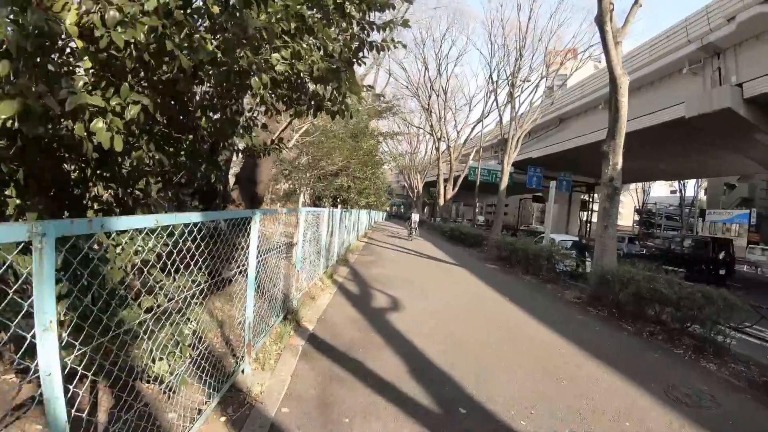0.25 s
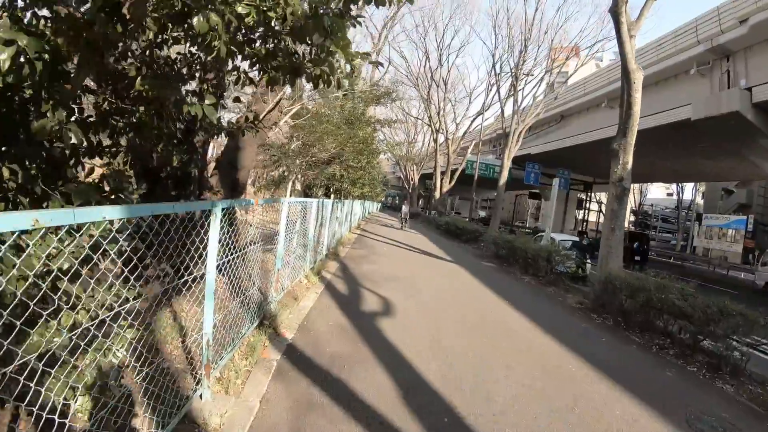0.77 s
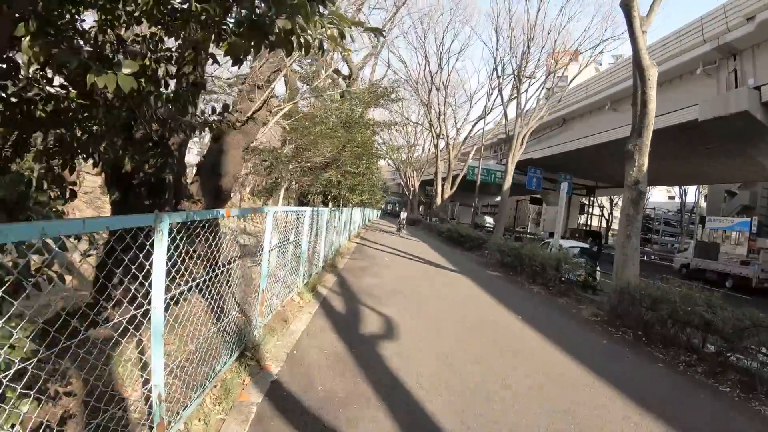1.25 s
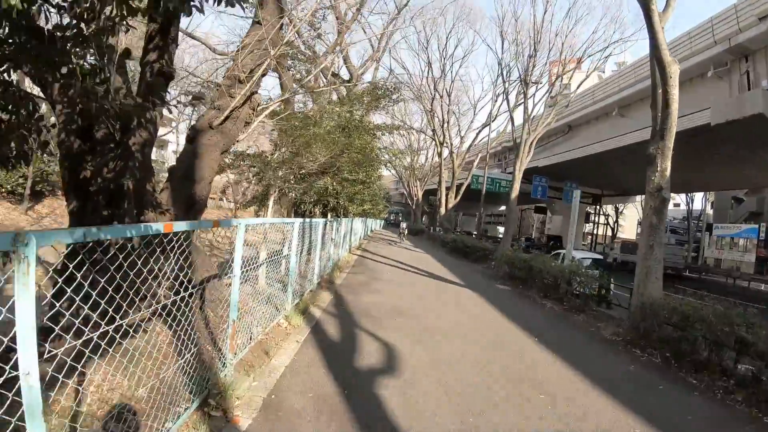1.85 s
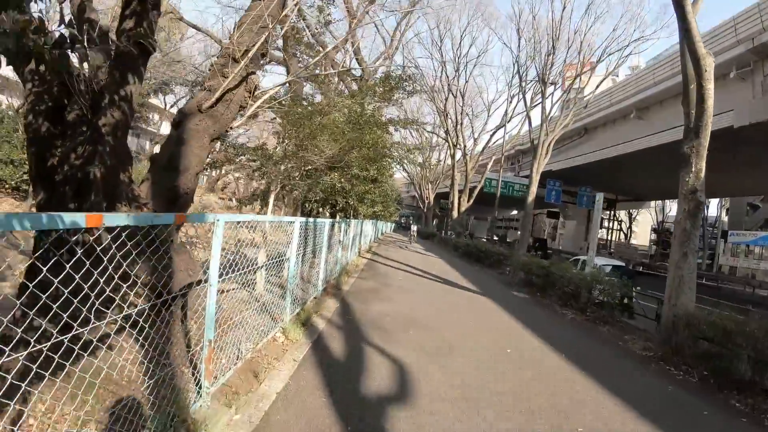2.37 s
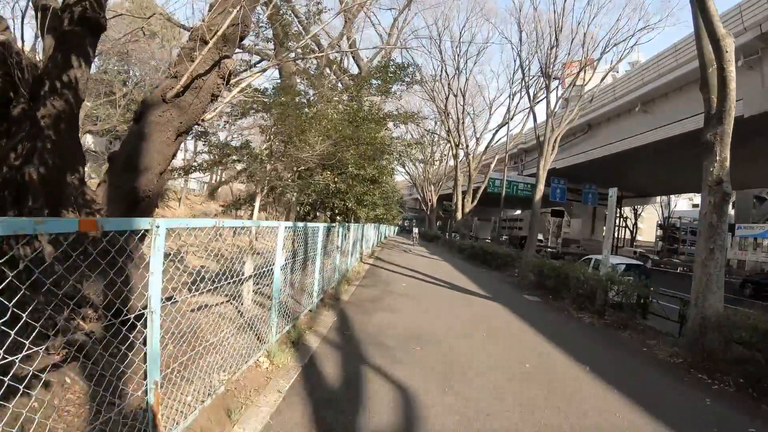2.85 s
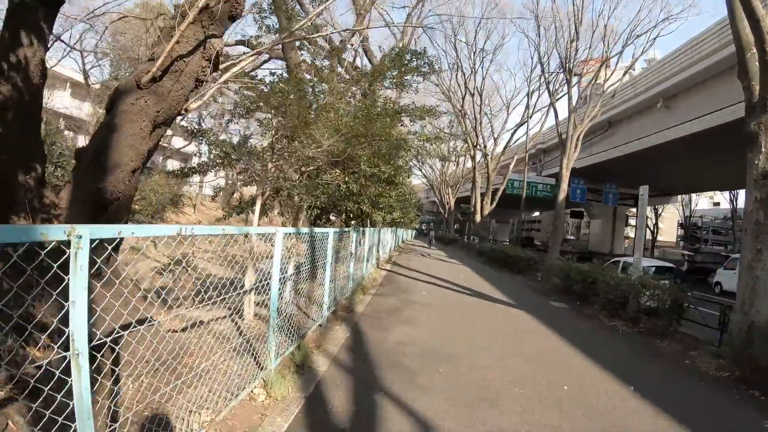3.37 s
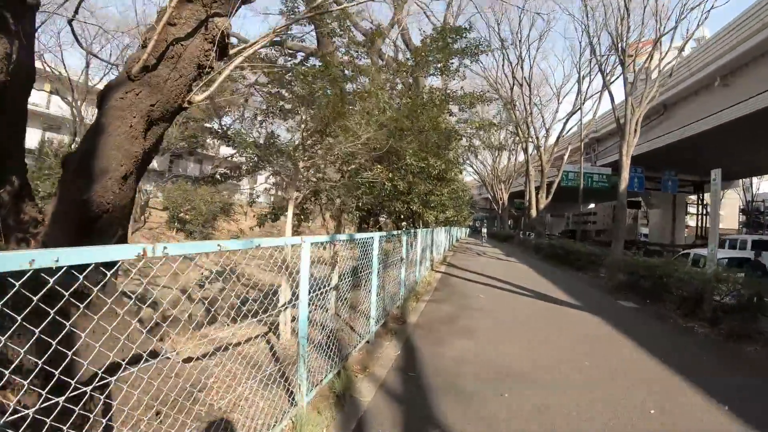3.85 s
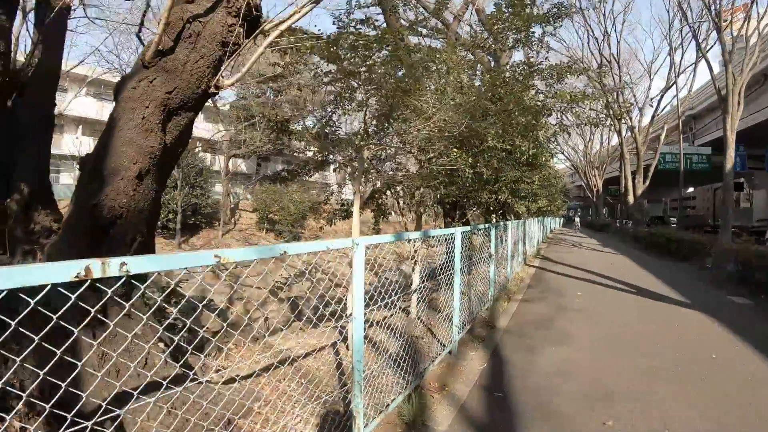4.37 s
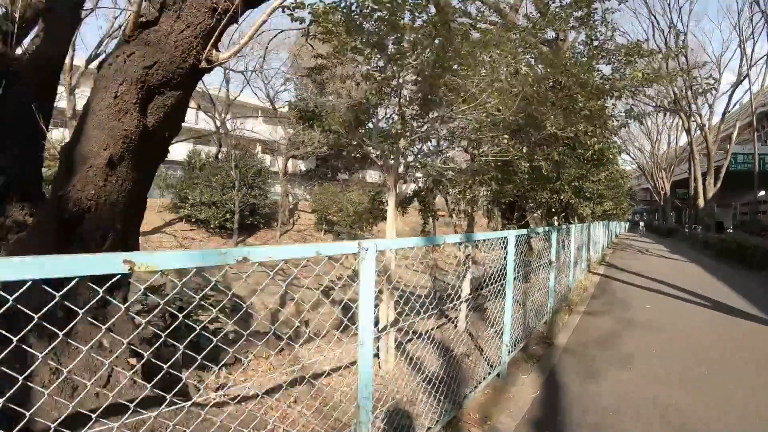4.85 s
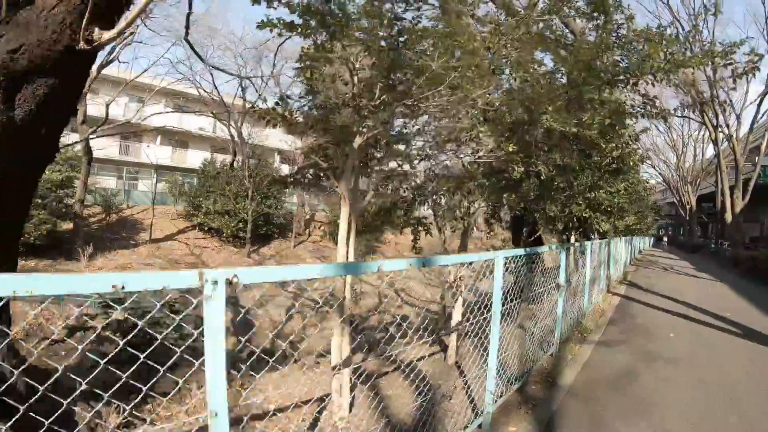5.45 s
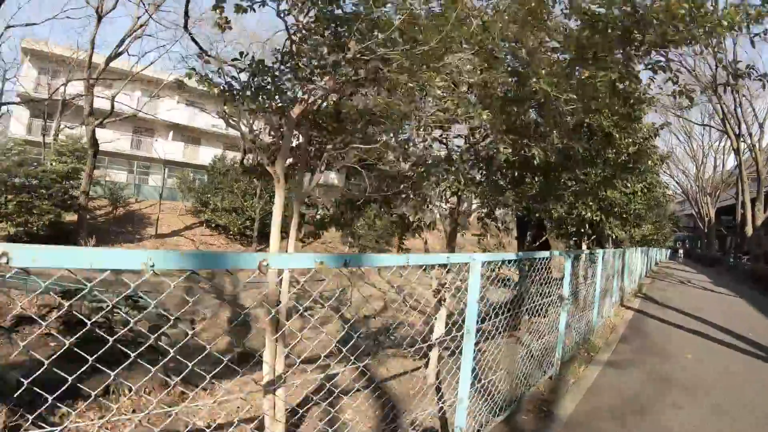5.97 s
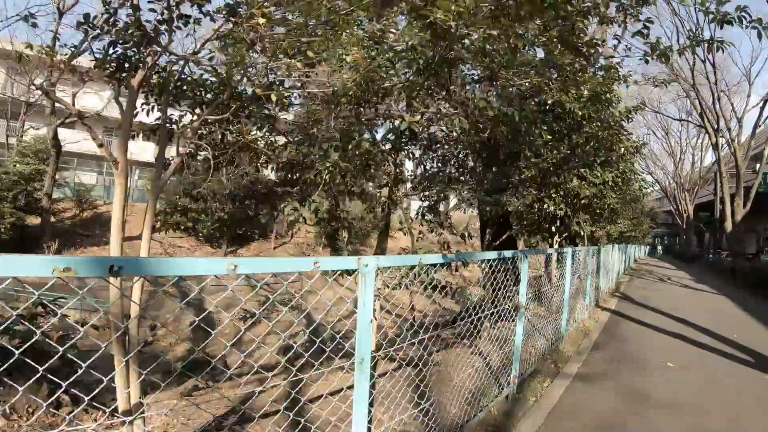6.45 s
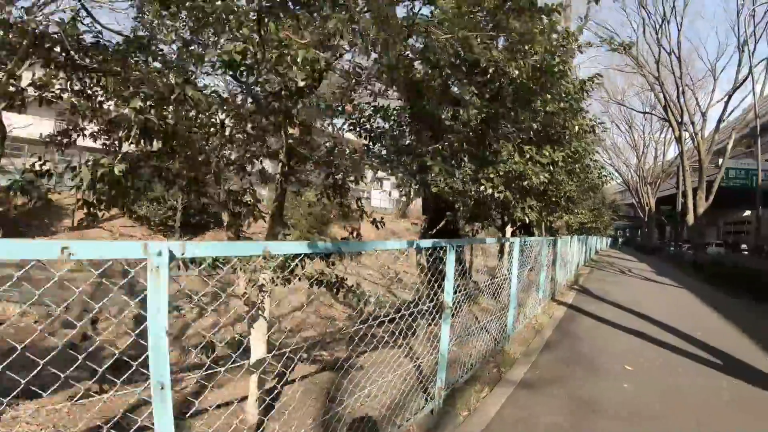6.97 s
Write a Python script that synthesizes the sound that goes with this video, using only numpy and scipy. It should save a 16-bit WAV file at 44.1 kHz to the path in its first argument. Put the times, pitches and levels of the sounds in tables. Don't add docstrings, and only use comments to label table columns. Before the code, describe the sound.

A continuous low roar of trucks and cars on a road and overhead viaduct, with throbbing engine hums and soft, dull tyre hiss.

```python
import sys
import numpy as np
from scipy import signal
from scipy.fft import rfft, irfft, next_fast_len
from scipy.io import wavfile
from scipy.ndimage import uniform_filter1d

SR = 44100
rng = np.random.default_rng(int(sys.argv[2]) if len(sys.argv) > 2 else 0)


def gain_from_decibels(decibels):
    exponent = np.asarray(decibels, float) / 20
    return 10 ** exponent


def master_out(mix):
    frames = np.transpose(np.atleast_2d(mix))
    ceiling = np.clip(frames, -1, 1)
    pcm = np.round(ceiling * 32767).astype(np.int16)
    wavfile.write(sys.argv[1], SR, pcm)


N = 317961
T = np.arange(N) / SR

# (time [s], level [dB])
TRUCKS_NEAR = [(0, 3), (.3, 2), (.7, 2), (1.2, 1), (1.7, 1), (2.1, 1.5), (2.7, 1.7), (3.05, -1), (3.6, 0),
               (4.2, -2), (4.5, -.5), (5.1, -1), (5.4, 0.5), (6.0, -0.5), (6.55, .5), (7.2, -1.5)]
# (time [s], level [dB])
CARS_NEAR = [(0, 0), (.45, 0.5), (1.0, 0), (1.5, 1.3), (2.2, -1.2), (2.8, -1), (3.3, -.5), (3.8, -1),
             (4.4, -1), (5.1, 1), (5.5, -0.5), (5.8, 1.5), (6.05, 0), (6.5, 2), (6.8, 0), (7.2, 1)]


def walk(rate):
    hold = int(SR / rate)
    levels = np.repeat(rng.standard_normal(N // hold + 1), hold)
    smooth = uniform_filter1d(uniform_filter1d(levels, hold), hold)
    return 1.277 * smooth[:N]


def engine(speed, clear, overtones_db=(), waver=0.0064, clear_s=0.11, hidden_db=-40.5):
    fade_s = 0.13
    s, hz = np.transpose(speed)
    firing_hz = np.interp(T, s, hz) * (1 + waver * walk(9))
    phase = 2 * np.pi * np.cumsum(firing_hz) / SR + rng.uniform(0, 2 * np.pi)
    tone = np.sin(phase)
    for multiple, db in enumerate(overtones_db, start=2):
        tone += gain_from_decibels(db) * np.sin(multiple * phase)
    heard = np.clip(np.minimum(T - s[0], s[-1] - T) / fade_s + 0.5, 0, 1)
    slow = T[::100]
    swell = gain_from_decibels(hidden_db)
    for at, db in clear:
        swell = swell + gain_from_decibels(db) * np.exp(-((slow - at) / clear_s) ** 2)
    return np.sqrt(2) * tone * heard * np.interp(T, slow, swell)


def truck_engines():
    # (time [s], firing rate [Hz])
    idling = [(0.3, 43.57), (1.1, 44.5), (3.1, 44.6), (3.7, 50), (4.3, 44.01), (5.3, 44.43), (5.9, 48.1),
              (6.3, 44.6), (7.2, 45.6)]
    cruising = [(0.0, 53.2), (2.5, 52.86), (3.6, 55.07), (4.2, 54.15), (5.1, 59.63), (5.6, 58),
                (7.2, 58.05)]
    pulling = [(0.1, 67.66), (1.5, 63.7), (2.1, 67.1), (2.98, 61.7)]
    # (time [s], level [dB])
    idling_clear = [(.42, -31), (.84, -23), (1.4, -26), (1.9, -31), (2.24, -23), (2.5, -27), (2.86, -30),
                    (3.28, -32), (3.98, -24), (4.4, -30), (4.72, -29), (5.22, -33), (6.24, -22.5),
                    (6.5, -24.5), (6.82, -26)]
    cruising_clear = [(.18, -26), (.62, -27.5), (1.1, -31.5), (1.53, -19.5), (1.88, -25), (2.42, -27),
                      (2.85, -26.5), (3.3, -29.5), (3.6, -26), (4.33, -29.5), (4.65, -35), (5.12, -21.5),
                      (5.6, -22), (5.78, -24), (6.0, -29), (6.38, -26), (6.9, -26), (7.15, -22)]
    pulling_clear = [(.27, -30), (.66, -22.5), (1.06, -29.5), (1.39, -31), (1.9, -29), (2.36, -25),
                     (2.67, -30)]
    overtones_db = (-14, -18)
    return (engine(idling, idling_clear, overtones_db)
            + engine(cruising, cruising_clear, overtones_db)
            + engine(pulling, pulling_clear, overtones_db))


def car_engines():
    # (time [s], tone rate [Hz])
    passing = [
        (3.35, 120.8),
        (3.62, 119),
        (4.2, 95),
    ]
    leaving = [(3.9, 89), (5.98, 88.5)]
    van = [(0.0, 207.6), (2.24, 201.6)]
    gear = [
        (5.5, 247.1),
        (5.9, 250.1),
        (6.62, 213.7),
    ]
    whine = [(6.1, 998), (6.9, 995)]
    # (time [s], level [dB])
    passing_clear = [(3.47, -27), (3.75, -22), (3.92, -32), (4.06, -25)]
    leaving_clear = [(4.22, -35.5), (4.68, -33), (5.02, -27.5), (5.4, -28), (5.62, -30), (5.98, -28.5)]
    van_clear = [(.2, -31), (.64, -27.5), (.97, -27), (1.28, -25.5), (1.76, -32), (2.24, -31.5)]
    gear_clear = [(5.8, -30), (6.3, -34.5)]
    whine_clear = [(6.42, -37), (6.74, -40)]
    hum = engine(passing, passing_clear, (-16,), waver=0.003, clear_s=0.1)
    hum += engine(leaving, leaving_clear, (-12,))
    hum += engine(van, van_clear, waver=0.012, clear_s=0.09)
    hum += engine(gear, gear_clear, waver=0.02)
    hum += gain_from_decibels(-7) * engine(whine, whine_clear, waver=0.012, clear_s=0.07, hidden_db=-50)
    return hum


def crowd(follows, layers_hz, colour, db, flicker_db, flicker_rate, grain_db=0.0):
    size = next_fast_len(N)
    octave = np.log2(np.maximum(np.arange(size // 2 + 1) * SR / size, 1))
    hz, shape_db = np.transpose(colour)
    shape = gain_from_decibels(np.interp(octave, np.log2(hz), shape_db, left=-120, right=-120))
    grains = gain_from_decibels(grain_db * rng.exponential(size=size))
    swells = [(np.interp(T, *np.transpose(control)), shares) for control, shares in follows]
    out = np.zeros(N)
    for centre in np.arange(np.log2(hz[0]), np.log2(hz[-1]) + 1 / 3, 1 / 3):
        band = np.cos(np.pi / 2 * np.clip(3 * (octave - centre), -1, 1))
        spectrum = rfft(grains * rng.standard_normal(size))
        noise = irfft(spectrum * band * shape, size)[:N]
        swell_db = sum(np.interp(centre, np.log2(layers_hz), shares) * swell for swell, shares in swells)
        out += noise * gain_from_decibels(swell_db + flicker_db * walk(flicker_rate))
    return out * gain_from_decibels(db) / np.std(out)


def exhaust_and_deck_roar():
    layers_hz = (50, 105, 190, 340)
    # (frequency [Hz], level [dB per Hz])
    colour = [(12, -10), (30, -10), (42, -6.5), (60, -3.5), (80, -9), (92, -7.5), (120, -6.5), (138, -11),
              (165, -7.5), (205, -8.5), (230, -11.5), (300, -12.5), (350, -17.5), (440, -21)]
    follows = [(TRUCKS_NEAR, (-0.58, 0.95, 0.74, 0.7)), (CARS_NEAR, (-0.2, 0.14, 0.1, 0.3))]
    return crowd(follows, layers_hz, colour, db=-20.5, flicker_db=0.74, flicker_rate=3)


def tyre_hiss():
    layers_hz = (580, 1050, 2000, 3900)
    # (frequency [Hz], level [dB per Hz])
    colour = [(440, -0.5), (520, -2.5), (650, -2.5), (800, -1), (1000, -3), (1300, -7), (1600, -10.5),
              (2000, -14.5), (2600, -20.5), (3300, -24.5), (4200, -29.5), (4700, -32.5), (5200, -40),
              (5700, -46)]
    follows = [(TRUCKS_NEAR, (0.59, 0.26, -0.24, 0.1)), (CARS_NEAR, (0.6, 0.9, 1.3, 0.7))]
    return crowd(follows, layers_hz, colour, db=-29.5, flicker_db=0.67, flicker_rate=5)


def puffs(events):
    out = np.zeros(N)
    for s, db, hz, width_hz, length in events:
        near = slice(max(round(s) - 1, 0) * SR, (round(s) + 1) * SR)
        edges_hz = [hz - width_hz / 2, hz + width_hz / 2]
        band = signal.butter(4, edges_hz, "bandpass", fs=SR, output="sos")
        noise = signal.sosfilt(band, rng.standard_normal(2 * SR))[:len(T[near])]
        swell = np.cos(np.pi * np.clip((T[near] - s) / length / 2, -0.5, 0.5)) ** 2
        out[near] += gain_from_decibels(db) * noise / np.std(noise) * swell
    return out


def passing_swishes():
    # (peak time [s], level [dB], frequency [Hz], width [Hz], length [s])
    swishes = [(1.65, -47, 1730, 500, 0.37), (3.02, -41, 1446, 400, 0.84), (6.3, -36, 1050, 350, 0.67),
               (6.53, -39, 1850, 800, 0.24), (6.68, -40, 1700, 810, 0.17), (4.72, -25, 23.98, 16, 0.56),
               (1.8, -36, 480, 120, .15), (.82, -38, 480, 100, .15), (4.5, -30, 190, 60, .2),
               (6.5, -28, 110, 40, .15), (6.9, -27, 105, 40, .15), (4.4, -31, 125, 30, .2),
               (2.65, -44, 1250, 250, .2), (1.95, -39, 780, 200, .2), (3.95, -38, 450, 120, .15),
               (5.6, -35, 360, 100, .35), (1.0, -33, 28, 12, .2), (1.6, -36, 33, 12, .25),
               (1.25, -32, 180, 20, .35), (7.05, -41, 1700, 900, .3), (5.0, -76, 7900, 1200, .6),
               (.5, -35, 270, 70, .2), (4.4, -36, 280, 70, .2)]
    return puffs(swishes)


def leaf_rustle():
    layers_hz = (6600, 8300, 11000, 12700, 14200)
    # (frequency [Hz], level [dB per Hz])
    colour = [(5700, 1), (6500, -1.5), (7300, 0.5), (8100, 0.5), (8800, -4), (9400, -11.5), (10000, -13),
              (10500, -13.0), (11000, -10), (12000, -13.5), (12800, -15.5), (13500, -24.5), (14200, -24.5),
              (15000, -36.5)]
    # (time [s], level [dB])
    breeze = [(0, -1.5), (.9, -2), (1.45, 1), (2.2, -1), (2.6, -1), (3.0, -1.5), (3.8, 1.5), (4.15, -0.5),
              (4.45, 2), (4.65, 2.5), (5.15, 4), (5.6, 2), (6.0, -1.5), (6.5, .5), (7.2, -2.5)]
    follows = [(TRUCKS_NEAR, (0.6, -0.2, 0.05, 0.05, -0.5)), (breeze, (0.1, 0.7, 0.8, 1.05, 1.4))]
    return crowd(follows, layers_hz, colour, db=-68.5, flicker_db=0.6, flicker_rate=25, grain_db=1.0)


def leaf_snaps():
    # (peak time [s], level [dB], frequency [Hz], width [Hz], length [s])
    snaps = [(1.475, -77, 11300, 2500, .02), (2.19, -91, 14060, 1500, .07), (2.6, -84, 12800, 2480, 0.085),
             (3.88, -84, 12300, 1477, .12), (4.085, -80, 11000, 1514, .025), (4.38, -81, 11000, 1509, .015),
             (4.47, -76, 11200, 2500, 0.029), (5.103, -77, 12200, 3000, .012),
             (5.555, -83, 12500, 2000, .012), (5.98, -82, 11000, 1510, .015), (2.58, -92, 14800, 1800, .06),
             (5.2, -86, 14000, 3500, .025), (5.55, -92, 15000, 1500, .012), (6.45, -97, 14200, 1200, .4),
             (4.15, -97, 14300, 1200, .25), (6.625, -80, 12000, 3007, .02)]
    return puffs(snaps)


def scene():
    engines = truck_engines() + car_engines()
    road = exhaust_and_deck_roar() + tyre_hiss() + passing_swishes()
    leaves = leaf_rustle() + leaf_snaps()
    return (engines + road + leaves)[None]


def roll_off(x):
    return signal.sosfilt(signal.butter(12, 15800, fs=SR, output="sos"), x)


def record(dry):
    return roll_off(dry)


dry = scene()
out = record(dry)
master_out(out)
```